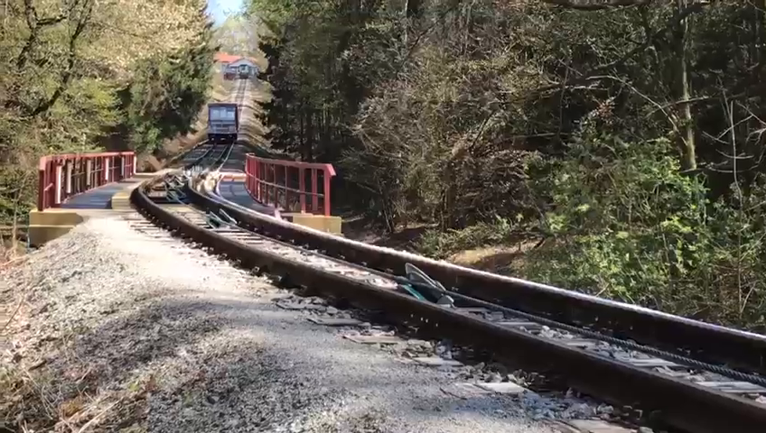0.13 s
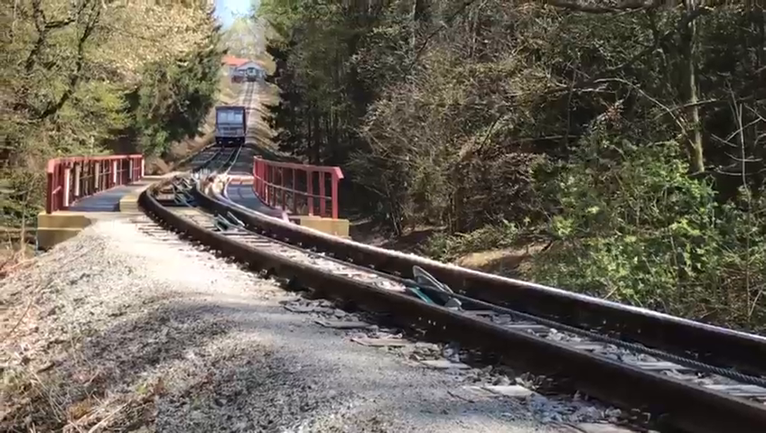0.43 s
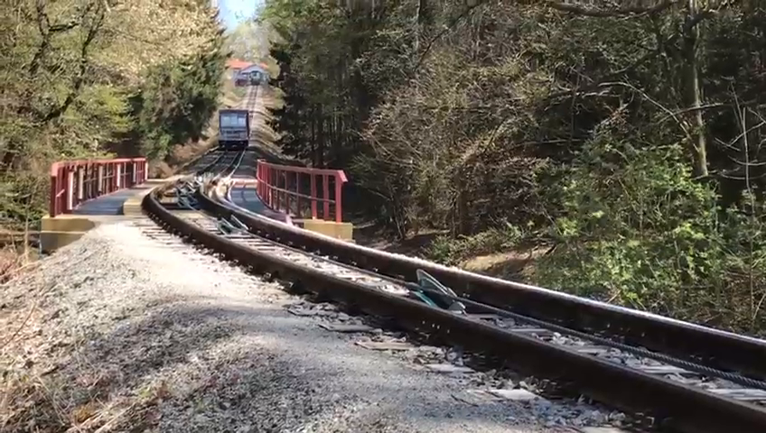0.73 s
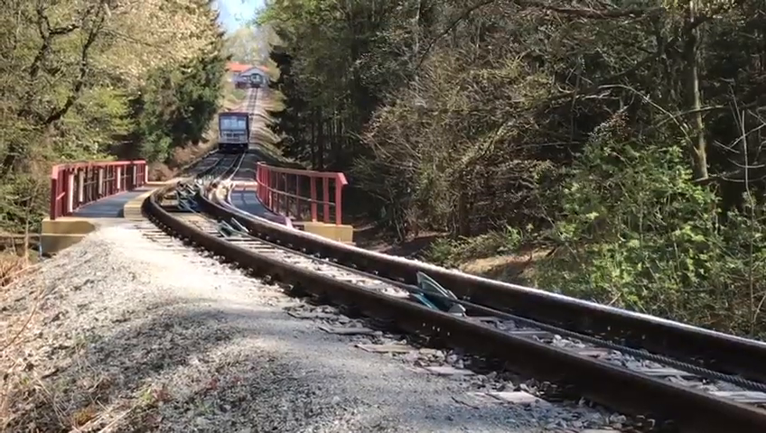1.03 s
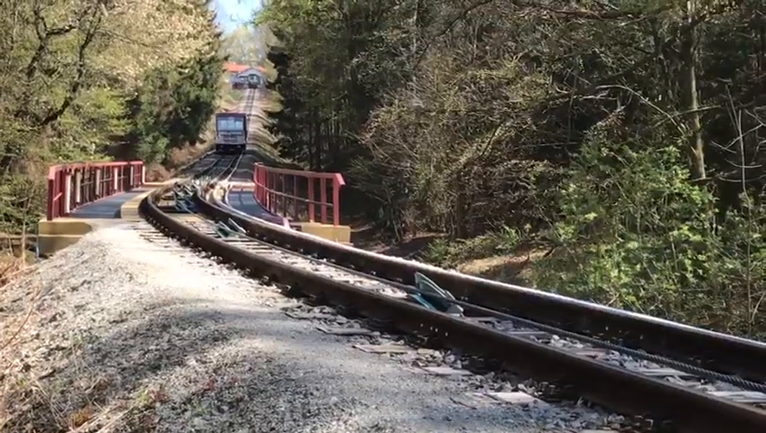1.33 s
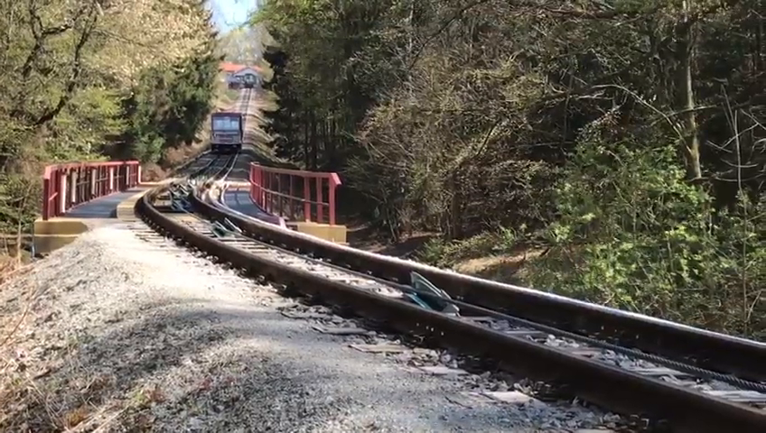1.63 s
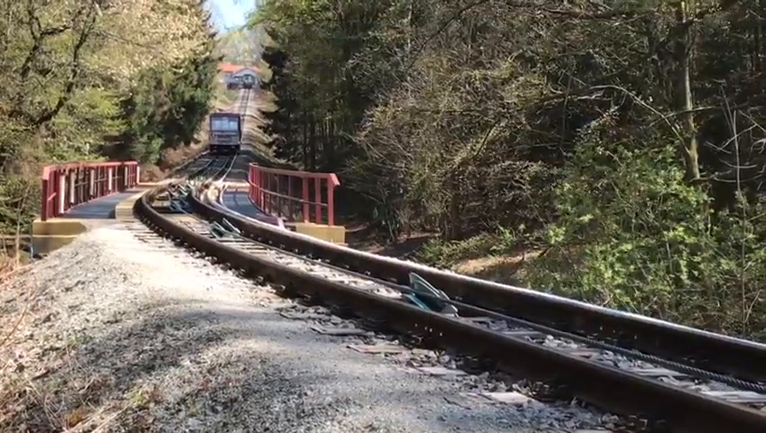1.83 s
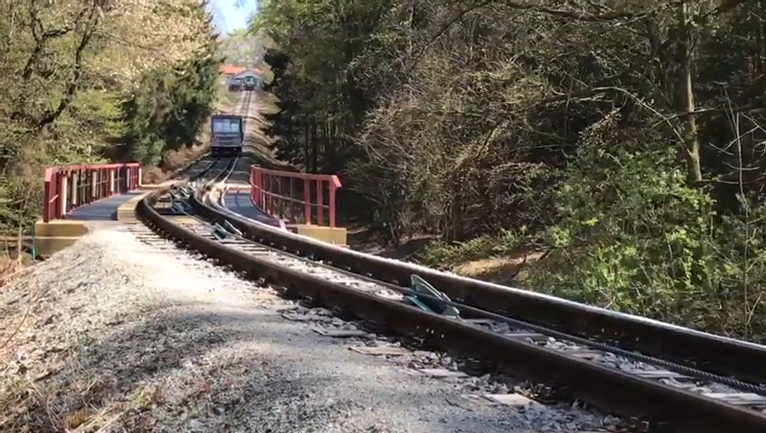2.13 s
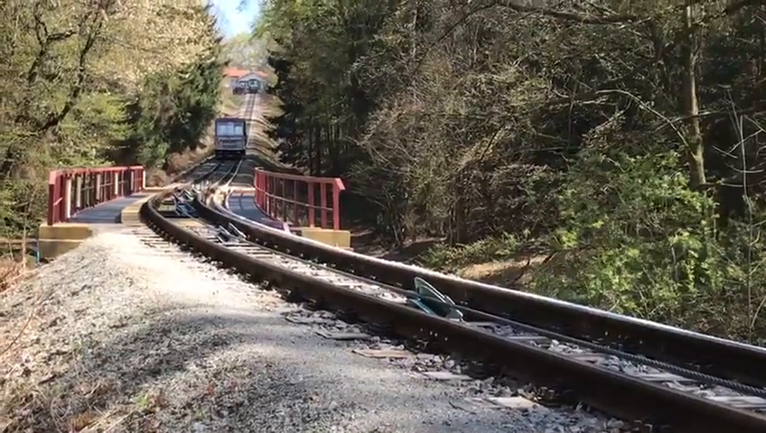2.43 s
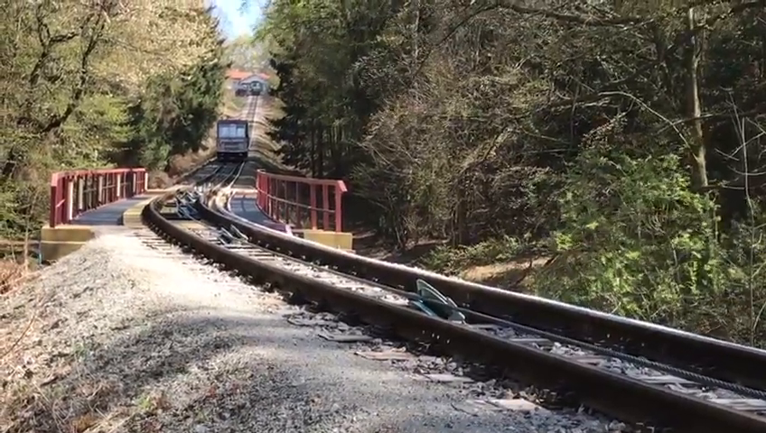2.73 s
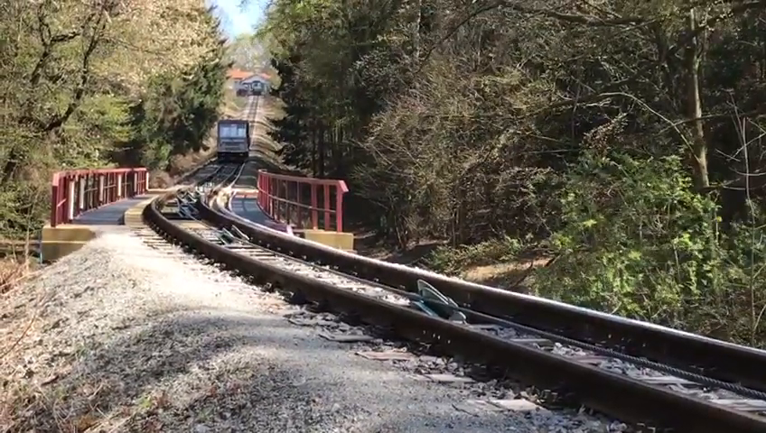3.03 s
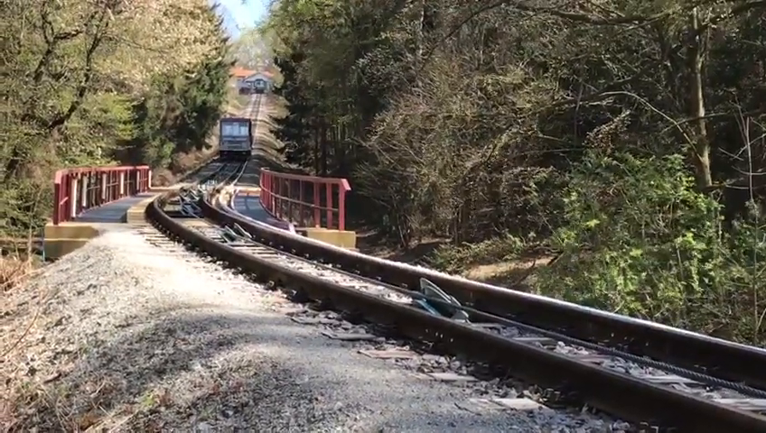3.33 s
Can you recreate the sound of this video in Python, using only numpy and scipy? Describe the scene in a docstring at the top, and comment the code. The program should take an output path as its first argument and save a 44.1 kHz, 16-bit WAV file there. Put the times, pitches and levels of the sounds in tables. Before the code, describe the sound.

Crisp, regular snaps from a cable pulley, with lighter ticks, soft hiss and low wind rumble

```python
"""A wavering hum, a patter, a hiss and a soft rush come from the haul cable of a funicular in a wood.
The cable is sines, resonant noise and struck modes; wind on the microphone is noise with short eddies.
The nearest pulley snaps about three times a second, with lighter ticks: slips that excite its rim.
Soft knocks, decaying modes of the wheel, follow some snaps; two faint whistles are gliding sines."""
import sys
import numpy as np
from scipy import signal
from scipy.fft import rfft, irfft
from scipy.io import wavfile

SR = 44100
rng = np.random.default_rng(int(sys.argv[2]) if len(sys.argv) > 2 else 0)


def log_audio(samples):
    """Write samples as a 16-bit WAV file to the path given in sys.argv[1]."""
    # one column per channel
    frames = np.atleast_2d(samples).T
    # limit to full scale, then quantise
    limited = np.clip(frames, -1, 1)
    pcm = np.round(limited * 32767).astype(np.int16)
    wavfile.write(sys.argv[1], SR, pcm)


N = 153909

# Modes of the pulley rim. Each row: nominal frequency in Hz, relative level in dB, t60 in seconds.
RIM_MODES = [(2820, -3.5, 0.0073), (3440, 3.5, 0.0074), (4420, 7, 0.0033), (5570, 0.5, 0.0084),
             (6140, -0.5, 0.013), (6910, 0.5, 0.0049), (8640, 0, 0.002), (9740, -10.5, 0.0077),
             (11200, -14.5, 0.0031)]


def undb(db):
    """Amplitude gain is ten to the power of decibels over twenty."""
    return 10 ** (np.asarray(db) / 20)


def unit(x):
    """Normalization of the mean power to 1, so that a gain sets the rms level."""
    return x / np.sqrt(np.mean(x ** 2))


def curve(rows):
    """Linear interpolation between (seconds, value) points."""
    return np.interp(np.arange(N) / SR, *np.array(rows).T)


def walk(rate_hz):
    """Low-pass Gaussian noise of rms 1: a smooth random fluctuation of bandwidth near rate_hz."""
    hz = np.arange(N // 2 + 1) * SR / N
    spectrum = rfft(rng.standard_normal(N)) * np.exp(-(hz / rate_hz) ** 2)
    return unit(irfft(spectrum, N))


def noise(points):
    """Spectral shaping of white noise by (Hz, dB) points joined on a log frequency axis; rms 1."""
    hz, db = np.array(points).T
    f = np.arange(N // 2 + 1) * SR / N + 1  # 1 Hz up, to avoid log(0)
    gain = undb(np.interp(np.log(f), np.log(hz), db))
    return unit(irfft(rfft(rng.standard_normal(N)) * gain, N))


def resonance(hz, width_hz):
    """Resonance under random excitation: noise of rms 1 with one steep-sided spectral peak."""
    f = np.arange(N // 2 + 1) * SR / N
    detuning = (f - hz) / width_hz * np.sqrt(2)
    return unit(irfft(rfft(rng.standard_normal(N)) / (1 + detuning ** 2), N))


def ring(modes, t, tune=1):
    """Modal superposition: an impulse starts decaying sines, neighbours in opposite senses."""
    out = 0
    for k, (hz, db, t60) in enumerate(modes):
        decay = np.exp(-np.log(1000) * t / t60)
        out = out + (-1) ** k * undb(db) * np.sin(2 * np.pi * hz * tune * t) * decay
    return out


def add(out, x, start_s):
    """Linear superposition: mix x into out from the given time."""
    i = max(int(start_s * SR), 0)
    out[i:i + len(x)] += x[:max(N - i, 0)]


def cable():
    """Frequency modulation and resonance: rolling strands give a wavering hum and rough peaks above it."""
    # Swelling and fading of the hum. Each row: time in seconds, level in dB before the flutter.
    hum_levels = [(0, -47.5), (.85, -52), (1.25, -50), (1.48, -56.5), (1.59, -41), (1.68, -60),
                  (1.81, -42.5), (1.9, -55.5), (2.01, -41), (2.3, -54.5), (2.56, -48), (2.65, -64),
                  (2.76, -40), (2.83, -67), (2.94, -37.5), (3.01, -53.5), (3.12, -36), (3.22, -51),
                  (3.49, -54.5)]
    # Rolling cable and far pulleys. Each row: frequency in Hz, width in Hz, level in dB.
    drone_peaks = [(140.7, 8.6, -63.5), (288.8, 31.6, -57), (394, 26.6, -65.5), (750, 11.6, -72),
                   (1032, 69, -65.5), (1190, 150, -78.5)]
    hum_hz, wander_share, flutter_db = 93.7, .0347, 3  # mean pitch; rms pitch and level changes
    pitch_hz = hum_hz * (1 + wander_share * walk(11.15))
    phase = 2 * np.pi * np.cumsum(pitch_hz) / SR
    hum = np.sqrt(2) * np.sin(phase) * undb(curve(hum_levels) + flutter_db * walk(27))
    return hum + sum(undb(db) * resonance(hz, width_hz) for hz, width_hz, db in drone_peaks)


def strands():
    """Impulse response: dense, uneven taps of the strands excite modes of the pulleys along the line."""
    # Ringing of the tapped pulleys. Each row: frequency in Hz, relative level in dB, t60 in seconds.
    pulley_modes = [(548, -5.5, 0.0093), (758, -3.5, 0.014), (940, 0, 0.0089), (1105, -1, 0.0079),
                    (1420, -4, 0.0053), (1754, -7.5, 0.0075)]
    taps_per_s, spread_db, level_db = 140, 2.5, -59.5  # taps per second for each mode
    out = np.zeros(N)
    t = np.arange(SR // 20) / SR
    for mode in pulley_modes:
        struck = rng.random(N) < taps_per_s / SR
        taps = struck * undb(spread_db * rng.standard_normal(N))
        out += signal.fftconvolve(taps, ring([mode], t))[:N]
    return undb(level_db) * unit(out)


def groove():
    """Friction noise: the cable hisses in the groove, and sparse specks of grit excite the rim modes."""
    # Spectrum of the hiss. Each row: frequency in Hz, relative density in dB per Hz.
    hiss_spectrum = [(1500, -40), (2600, -0.5), (3350, 2.5), (3950, 0.5), (4350, 0), (4950, -2.5),
                     (5600, -1.5), (6300, -2.5), (7200, -6), (7700, -11.5), (9600, -8.5), (10400, -13),
                     (11500, -14.5), (13000, -43)]
    hiss_db, sway_db = -68.5, 1.7
    grit_per_s, grit_spread_db, grit_db = 91, 4, -75.5
    struck = rng.random(N) < grit_per_s / SR
    specks = struck * undb(grit_spread_db * rng.standard_normal(N))
    grit = signal.fftconvolve(specks, ring(RIM_MODES, np.arange(SR // 20) / SR))[:N]
    hiss = noise(hiss_spectrum) * undb(hiss_db + sway_db * walk(36))
    return hiss + undb(grit_db) * unit(grit)


def woods():
    """Broadband noise from many small sources: the even rush of the line and the trees."""
    # Spectrum of the rush. Each row: frequency in Hz, relative density in dB per Hz.
    rush_spectrum = [(15, -39), (40, 6), (70, 18.5), (150, 11.5), (240, 3), (370, 7.5), (480, -1.5),
                     (650, -3.5), (950, 1), (1350, -3), (1800, -8), (2400, -14.5), (3200, -37), (6000, -34)]
    rush_db, sway_db = -49.5, -.03
    return noise(rush_spectrum) * undb(rush_db + sway_db * walk(6.5))


def wind():
    """Turbulent pressure: a breeze rumbles on the microphone, and eddies thump briefly and churn."""
    # Strength of the breeze. Each row: time in seconds, level in dB.
    breeze_levels = [(0, -65), (.25, -68), (.35, -46), (.7, -55), (1.1, -54), (1.28, -41), (1.48, -55),
                     (2.3, -60), (2.8, -53.5), (3.15, -51), (3.3, -42), (3.49, -74)]
    # Spectrum of the breeze. Each row: frequency in Hz, relative density in dB per Hz.
    buffet_spectrum = [(15, -49), (28, 2), (42, -0.5), (65, 1), (150, -10.5), (280, -16), (500, -41.5),
                       (1500, -97)]
    # Single eddies. Each row: centre in seconds, mean pitch in Hz, level in dB before the trim,
    # standard deviation of the bell-shaped envelope in seconds.
    eddies = [(0.33, 76.26, -30, 0.013), (0.369, 170, -31.5, 0.0023), (0.474, 70, -41, 0.025),
              (0.527, 79.4, -35, 0.0073), (0.652, 150, -38.5, 0.0067), (0.658, 57.2, -31.5, 0.012),
              (0.816, 55, -38.5, 0.025), (0.918, 55, -37, 0.029), (1.017, 62, -31.5, 0.011),
              (1.057, 56, -32, 0.014), (1.184, 87.1, -30, 0.012), (1.227, 108.7, -32, .005),
              (1.2523, 114.9, -25.5, 0.0037), (1.283, 109.9, -23.5, 0.0036), (1.294, 80.54, -22.5, 0.0041),
              (1.307, 169.9, -34.5, 0.0024), (1.412, 60.3, -27, 0.0094), (3.284, 65.37, -33, 0.022),
              (3.287, 116.7, -27, 0.0037), (3.358, 90, -33, 0.0084), (3.375, 60, -36.5, 0.02)]
    # Fine turbulence inside an eddy. Each row: frequency in Hz, relative density in dB per Hz.
    churn_spectrum = [(60, -23), (130, 3), (250, 4.5), (400, -10), (900, -57.5)]
    trim_db, roughness, churn_db = -2, .117, -15.5  # roughness: rms share of the pitch
    t = np.arange(N) / SR
    out = noise(buffet_spectrum) * undb(curve(breeze_levels))
    swirl_s = t + roughness * np.cumsum(walk(94.3)) / SR  # uneven time makes the pitch uneven
    churn = noise(churn_spectrum) * undb(churn_db)
    for centre, hz, db, length in eddies:
        swing = np.sin(2 * np.pi * (hz * swirl_s + rng.random()))
        thump = swing + churn * hz / churn_spectrum[1][0]  # quick eddies churn more
        envelope = np.exp(-.5 * ((t - centre) / length) ** 2)
        out += undb(db + trim_db) * envelope * thump
    return out


def snaps():
    """Stick-slip excitation: tiny slips grow until the cable lets go, and the rim rings briefly."""
    # Hard snap of each turn. Each row: middle of the slip in seconds, level in dB before the trim,
    # length of the slip in seconds, brightness in dB per octave, strongest ring in Hz, its lift in dB.
    hard_snaps = [(0.313, -47.5, 0.0043, 3, 3750, 6), (0.654, -50.5, .003, 2, 3700, 8),
                  (0.9926, -43.5, 0.0027, -0.5, 4350, 2), (1.3305, -43, 0.0023, 1.5, 3650, 1),
                  (1.67, -43, .0025, 1.5, 3330, 8), (2.0064, -46.5, 0.0035, 4, 4250, 10),
                  (2.3434, -43.5, 0.0029, 5, 3390, 17.5), (2.679, -43.5, 0.00081, -0.5, 3730, 6),
                  (3.0144, -43.5, 0.0011, 4.5, 3500, 8), (3.3482, -45, 0.0016, 4, 3580, 8.5)]
    # Lighter ticks from other spots on the rim. Each row: middle of the slip in seconds,
    # level in dB before the trim, length of the slip in seconds, brightness in dB per octave.
    light_ticks = [(0.0623, -59, 0.00077, -10), (0.172, -50, .001, -3.5), (0.4885, -56, 0.00067, -11),
                   (0.5114, -48, .002, -8.5), (0.559, -56.5, 0.00078, 0), (0.5805, -52, .002, -2),
                   (.8025, -58, 0.0011, 7), (0.8534, -49.5, .001, 3), (0.899, -57, 0.0011, 2),
                   (1.1187, -54.5, 0.0012, -3), (1.1892, -48, 0.00035, 1.5), (1.2395, -61, 0.0015, 2),
                   (1.529, -50.5, 0.00096, -2.5), (1.5755, -58.5, 0.00084, -1), (1.611, -49.5, 0.00083, -3),
                   (1.795, -55, 0.00085, -6), (1.868, -49.5, 0.00077, -1), (1.914, -57, 0.0024, 4),
                   (2.2022, -47.5, 0.0028, -3), (2.2521, -56.5, .002, 3), (2.47, -59, .001, -3),
                   (2.5387, -49.5, .001, 4), (2.5884, -53, 0.00066, -2), (2.7635, -56, .001, -8),
                   (2.805, -54, 0.00088, -2), (2.828, -55, .001, -3), (2.874, -45.5, 0.00031, 0),
                   (2.9204, -53.5, 0.0037, 3), (3.2086, -48, .001, -7), (3.2598, -54.5, .001, 3)]
    trim_db, slip_spread_db, slip_rise = 1.6, 6, 1.3  # slips grow by a factor of exp(slip_rise)
    evenness, ring_width_hz, tune_spread = .4, 200, .025  # evenness 1 would flatten the slip spectrum
    scatter_db, scatter_t60_s = -12, .03
    out = np.zeros(N)
    t = np.arange(2048) / SR
    lead_s = t[len(t) // 4]
    hz = np.arange(len(t) // 2 + 1) * SR / len(t)
    octaves = np.log2(np.maximum(hz / RIM_MODES[0][0], 1))  # above the lowest rim mode
    for middle, db, length, bright_db, *lift in hard_snaps + light_ticks:
        colour_db = bright_db * octaves
        if lift:
            ring_hz, lift_db = lift
            colour_db = colour_db + lift_db / (1 + ((hz - ring_hz) / ring_width_hz) ** 2)
        # every spot on the rim rings a little differently
        rim = rfft(ring(RIM_MODES, t, 1 + tune_spread * rng.standard_normal()))
        sign, size = rng.standard_normal((2, len(t)))
        progress = np.clip((t - lead_s) / max(length, 2 / SR), 0, 1)
        slipping = (progress > 0) * (progress < 1)
        pulses = np.sign(sign) * undb(slip_spread_db * size)
        slips = rfft(pulses * np.exp(slip_rise * progress) * slipping)
        evened = slips / (np.abs(slips) + 1e-9) ** evenness
        snap = irfft(evened * rim * undb(colour_db))
        snap /= np.sqrt(np.sum(snap ** 2) / (.001 * SR))  # energy of rms 1 over 1 ms
        add(out, snap * undb(db + trim_db), middle - length / 2 - lead_s)
    t = np.arange(SR // 4) / SR
    tail = rng.standard_normal(len(t)) * np.exp(-np.log(1000) * t / scatter_t60_s)
    scattered = signal.fftconvolve(out, tail / np.linalg.norm(tail))[:N]
    return out + undb(scatter_db) * scattered


def knocks():
    """Modal vibration: the wheel is struck twice in quick succession, with varying upper modes."""
    # Knocks just after a snap. Each row: start in seconds, level in dB before the trim, pitch in Hz,
    # level of the upper modes in dB, level of the second strike in dB relative to the first.
    wheel_knocks = [(0.323, -56, 1010, -2, -4), (.997, -58, 980, -5, 2), (1.3356, -50, 973, -2, -4),
                    (1.676, -42.5, 994, -2, -3), (2.011, -40.5, 952, 1.5, -8), (2.3494, -40, 997, -2, -3),
                    (2.686, -51, 980, 8, -8)]
    # Modes of the wheel, retuned to the pitch of each knock.
    # Each row: nominal frequency in Hz, relative level in dB, t60 in seconds.
    wheel_modes = [(980, 9, 0.05), (1165, 4.5, 0.049), (1600, -4.5, 0.07), (2057, -9, 0.095)]
    again_s, trim_db = .006, -3.7  # nominal delay of the second strike, shorter at higher pitch
    out = np.zeros(N)
    t = np.arange(SR // 5) / SR
    for start, db, hz, upper_db, again_db in wheel_knocks:
        tune = hz / wheel_modes[0][0]
        lowest = ring(wheel_modes[:1], t, tune)
        upper = ring(wheel_modes[1:], t, tune)
        knock = lowest - undb(upper_db) * upper
        knock = knock + undb(again_db) * np.interp(t - again_s / tune, t, knock, left=0)
        knock /= np.sqrt(np.sum(knock ** 2) / (.01 * SR))  # energy of rms 1 over 10 ms
        add(out, knock * undb(db + trim_db), start)
    return out


def whistles():
    """Random frequency and amplitude modulation: two thin far notes are blurred on their way."""
    # Faint whistles. Each row: start in seconds, length in seconds, mean pitch at the start in Hz,
    # mean pitch at the end in Hz, peak level in dB before the flicker.
    far_notes = [(1.24, .08, 3100, 2950, -71), (1.34, 0.27, 4230, 4210, -75)]
    waver_share, flicker_db = .016, 2.5  # rms changes of pitch and level
    out = np.zeros(N)
    blur = 1 + waver_share * walk(260)
    for start, length, from_hz, to_hz, db in far_notes:
        progress = np.clip((np.arange(N) / SR - start) / length, 0, 1)
        hz = (from_hz + (to_hz - from_hz) * progress) * blur
        envelope = np.sqrt(2 * np.abs(np.sin(np.pi * progress)))
        out += undb(db) * envelope * np.sin(2 * np.pi * np.cumsum(hz) / SR)
    return out * undb(flicker_db * walk(40))


def scene():
    """Superposition of all sources as heard from the side of the track."""
    line = cable() + strands() + groove() + woods()
    pulley = snaps() + knocks()
    return (line + wind() + pulley + whistles())[None]


def record(dry):
    """Band limiting: a high-pass cuts the deepest rumble and a steep low-pass cuts the top."""
    low_cut_hz, top_hz = 24.4, 12000
    high_pass = signal.butter(2, low_cut_hz, "high", fs=SR, output="sos")
    low_pass = signal.ellip(10, .2, 70, top_hz, fs=SR, output="sos")
    return signal.sosfilt(low_pass, signal.sosfiltfilt(high_pass, dry))


dry = scene()
out = record(dry)
log_audio(out)
```